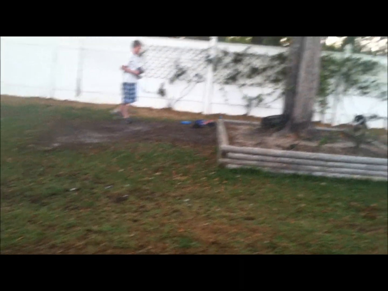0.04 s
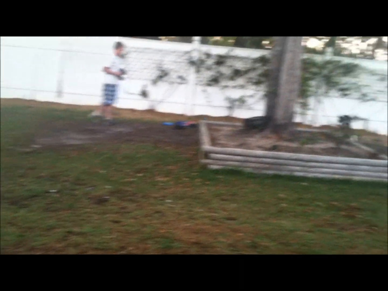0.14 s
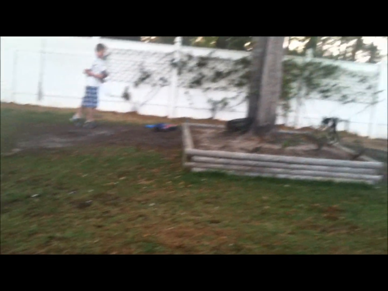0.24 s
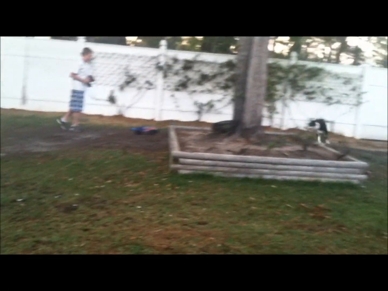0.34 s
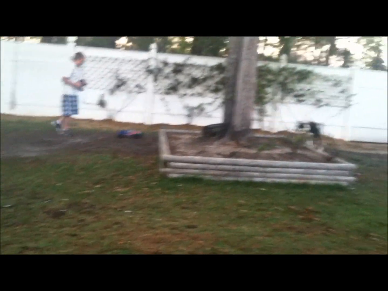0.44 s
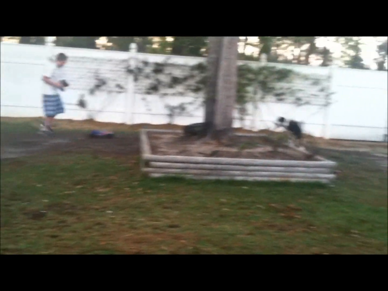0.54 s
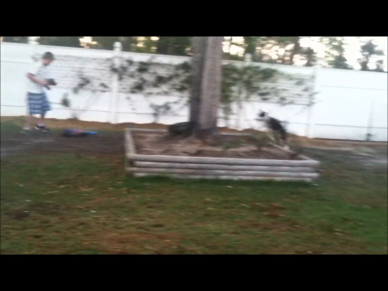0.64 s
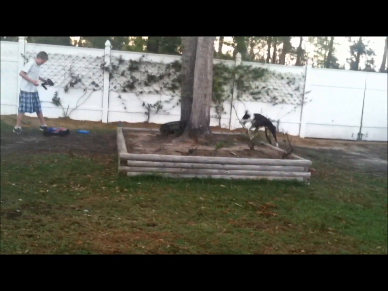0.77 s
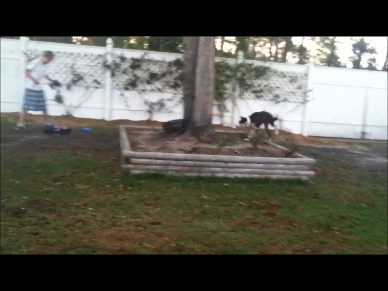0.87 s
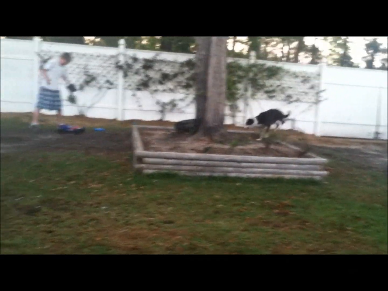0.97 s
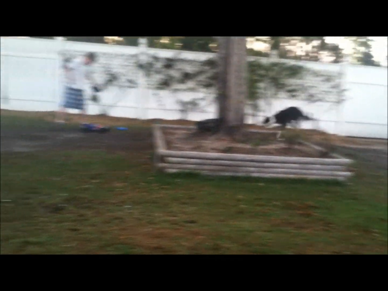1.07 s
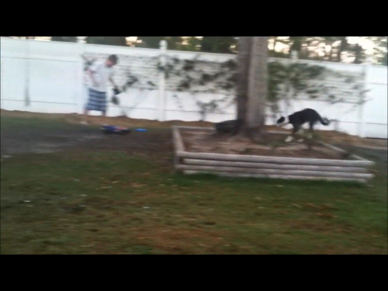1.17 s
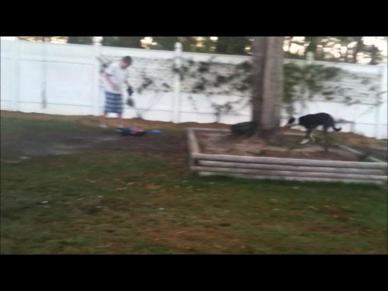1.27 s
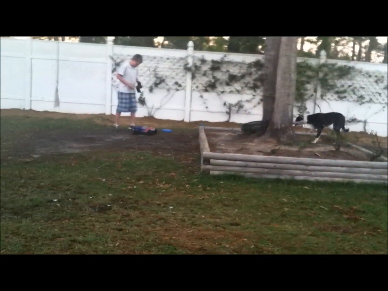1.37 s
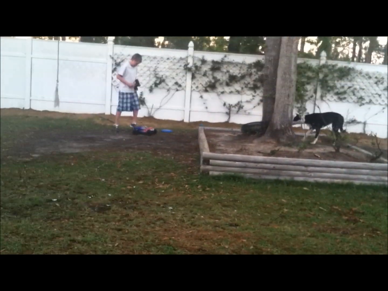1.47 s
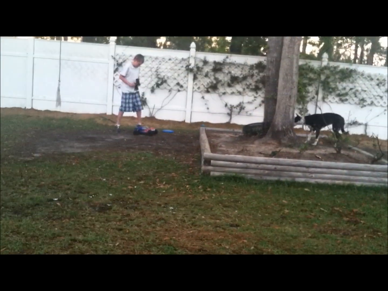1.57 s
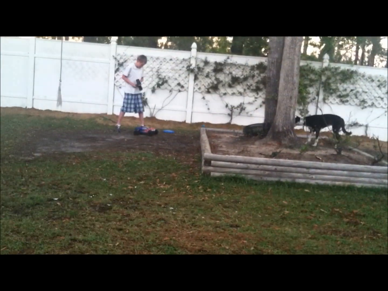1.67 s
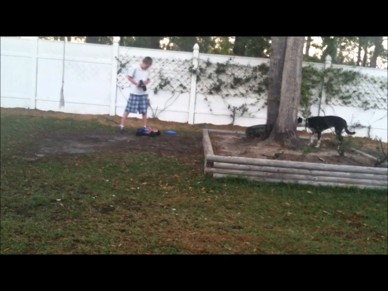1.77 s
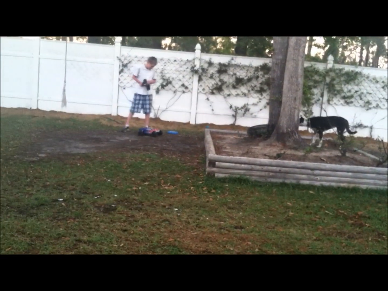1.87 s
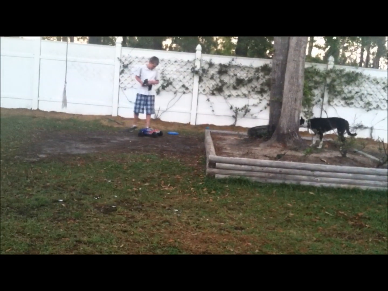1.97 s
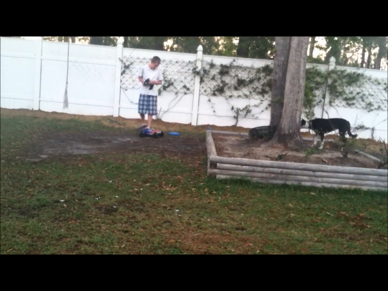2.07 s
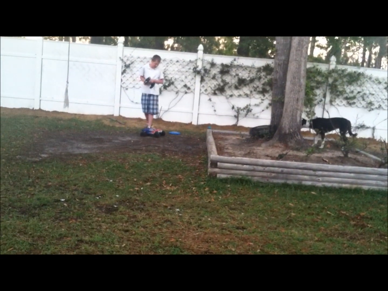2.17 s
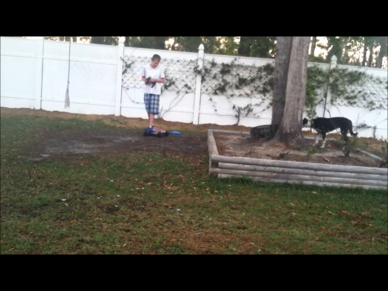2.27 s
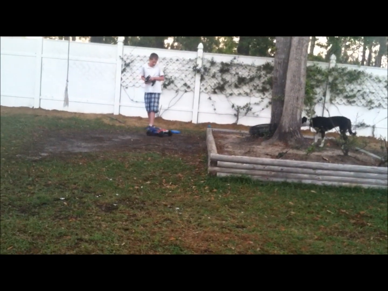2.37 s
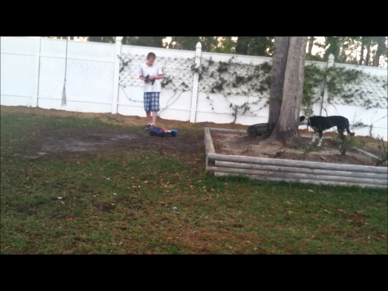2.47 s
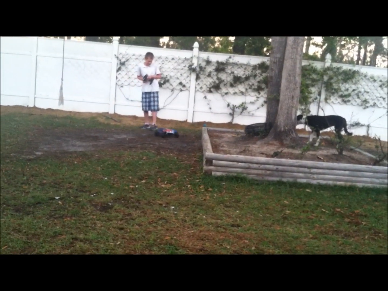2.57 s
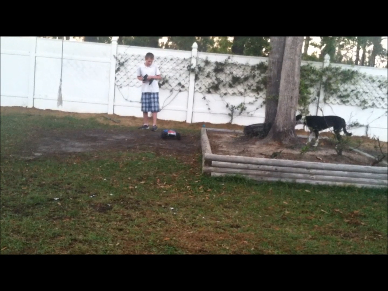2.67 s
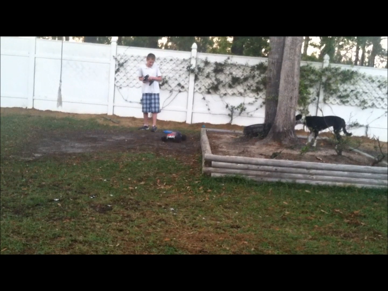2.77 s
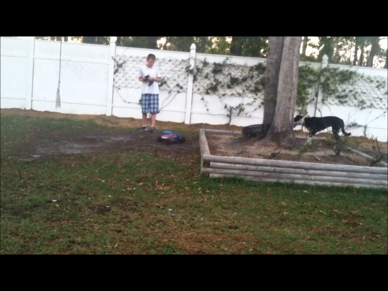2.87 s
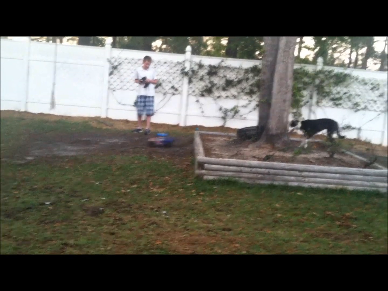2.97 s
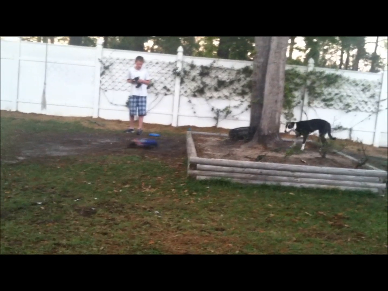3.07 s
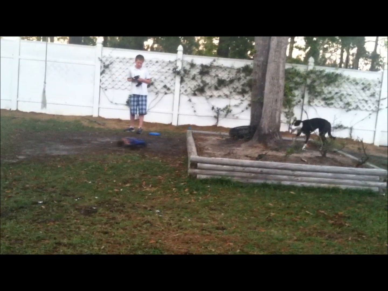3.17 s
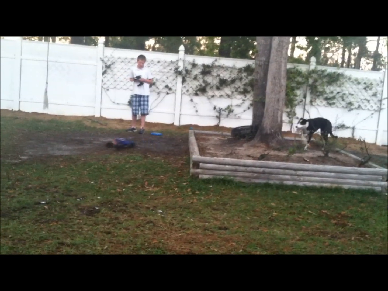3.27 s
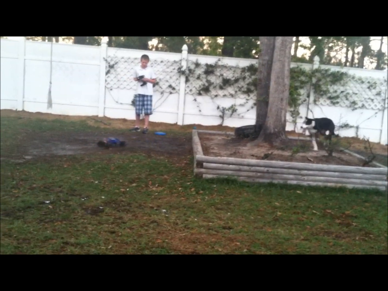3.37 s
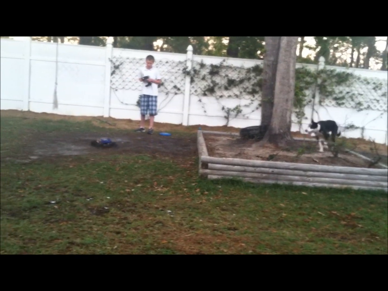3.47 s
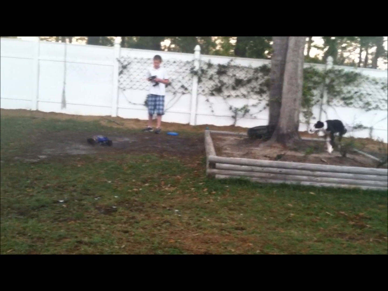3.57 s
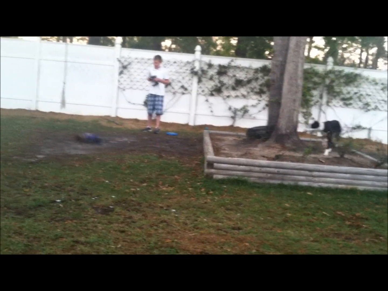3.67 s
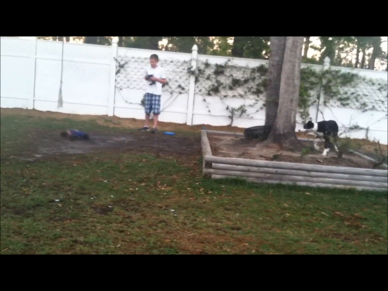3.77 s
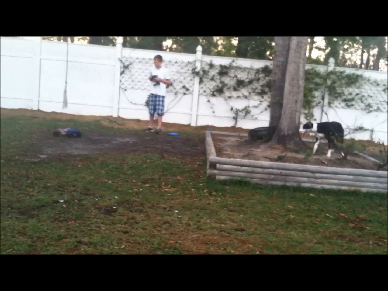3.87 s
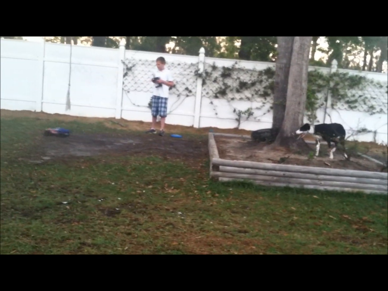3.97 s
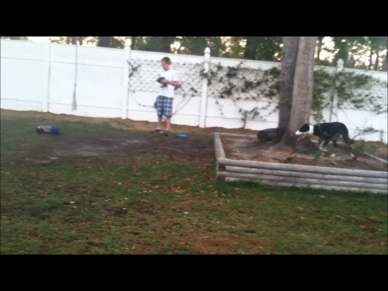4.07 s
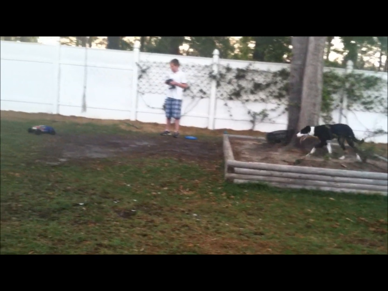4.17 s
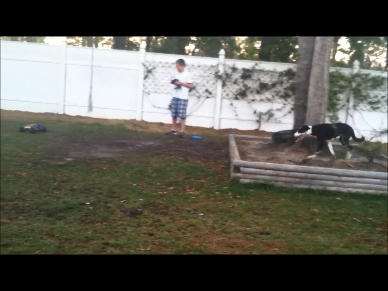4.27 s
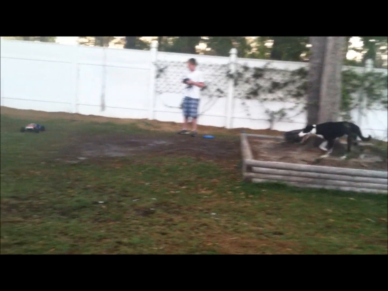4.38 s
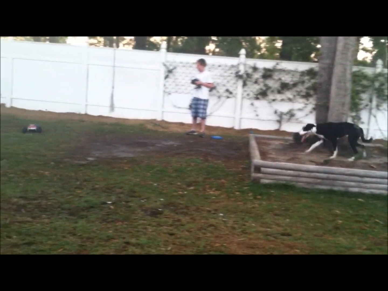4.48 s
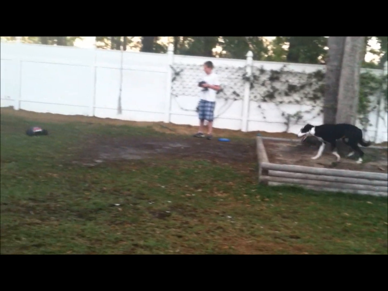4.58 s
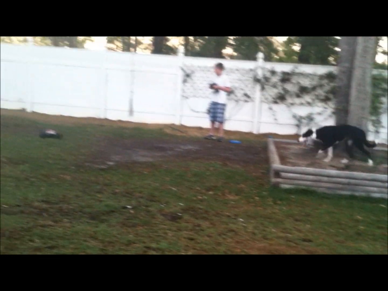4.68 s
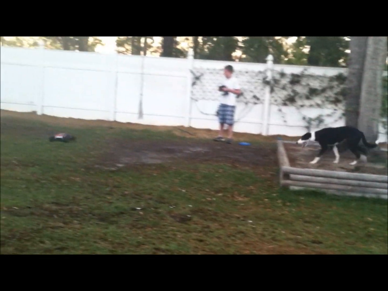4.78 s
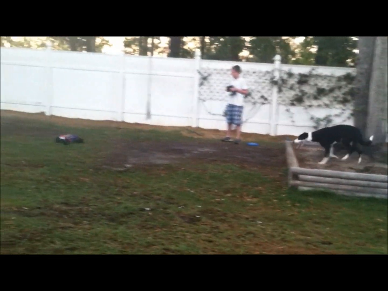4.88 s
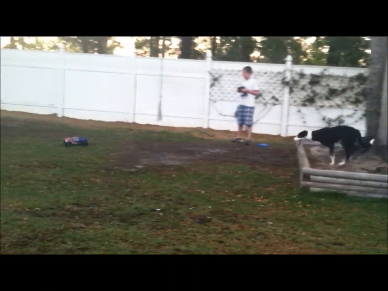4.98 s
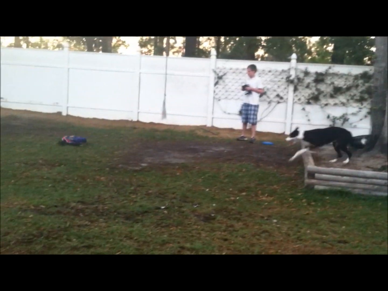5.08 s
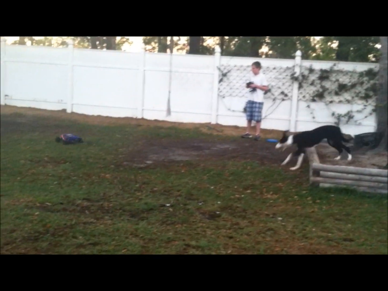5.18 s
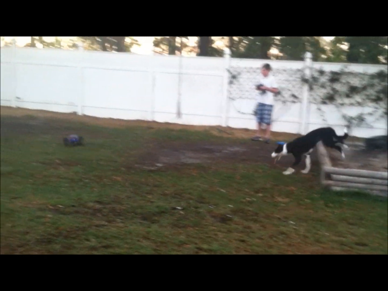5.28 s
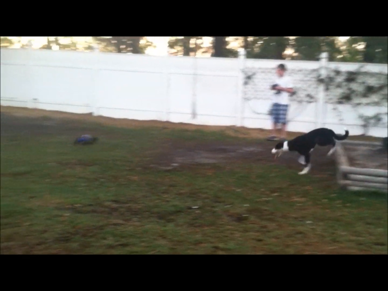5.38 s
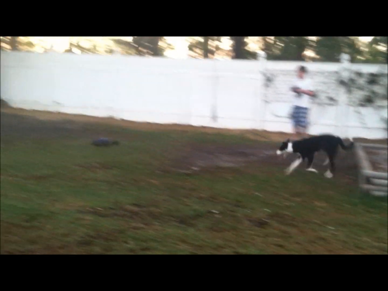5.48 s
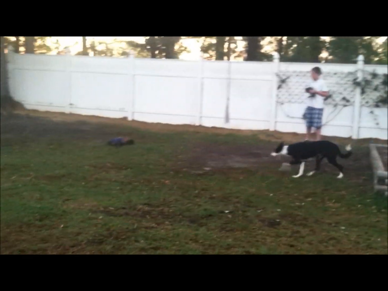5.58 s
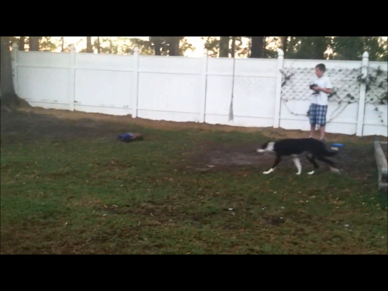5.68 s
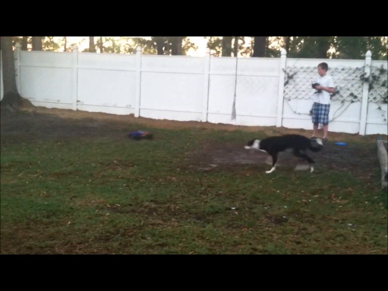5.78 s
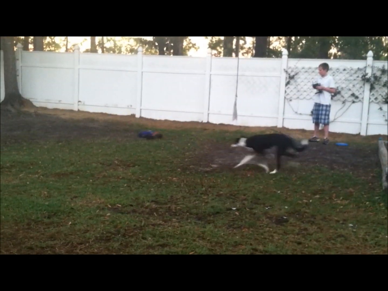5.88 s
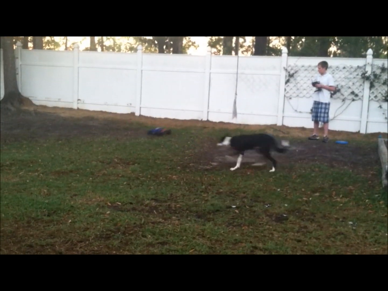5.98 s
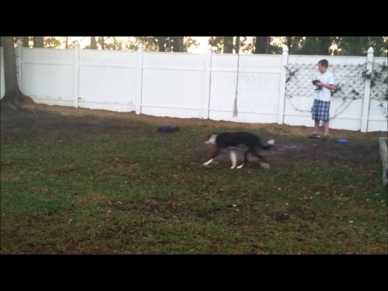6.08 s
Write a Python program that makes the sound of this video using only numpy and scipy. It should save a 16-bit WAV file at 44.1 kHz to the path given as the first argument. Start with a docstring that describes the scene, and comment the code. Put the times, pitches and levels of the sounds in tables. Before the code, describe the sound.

Outdoors in a backyard, smooth faint distant traffic and a few dry ticks nearby. A small electric toy car gives two short rattling buzzes, then goes quiet for about a second. It starts again and keeps running to the end, its plastic gears whining unsteadily, with dense clicks, squeaky tones, wheels drumming on grass and small knocks. One handheld microphone, same sound in both channels.

```python
"""Ticks and rustles sound close by over smooth far traffic, which fades slowly throughout.
A small electric toy car then runs on a lawn: two short bursts, a pause, and a long run to the end.
Its gears make wavering tones and dense clicks that ring in the shell; short rough tones join in.
The wheels drum as lumpy noise on the turf; bumps and snapping gear teeth ring as short dying tones.
Traffic and ticks are shaped noise. One microphone feeds both channels."""
import sys
import numpy as np
from scipy import signal
from scipy.fft import rfft, irfft, next_fast_len
from scipy.io import wavfile

SR = 44100
rng = np.random.default_rng(int(sys.argv[2]) if len(sys.argv) > 2 else 0)


def master_out(mix):
    """Clip the mix to full scale and print it as 16-bit PCM to the path in sys.argv[1]."""
    frames = np.transpose(np.atleast_2d(mix))
    ceiling = np.clip(frames, -1, 1)
    pcm = np.round(ceiling * 32767).astype(np.int16)
    wavfile.write(sys.argv[1], SR, pcm)


N = 270774   # samples

# throttle pulls: on t/s, spin-up time t/s, off t/s
THROTTLE_PULLS = [(0.209, 0.037, 0.62), (0.77, 0.11, 1.07), (2.277, 0.079, 6.3)]
STANDSTILL_DB, COAST_DB_PER_S = -11, 91   # effort at the first turn; its fall after letting go

# gear teeth meeting: t/s, mesh pitch f/Hz, clarity of the whine against the rattle (0-1)
GEAR_MESH = [(0.2, 1016, 0.12), (1.1, 1002, 0.74), (2.36, 705, 0.7), (2.42, 735, 0.86), (2.46, 770, 0.65),
             (2.498, 742, 0.9), (2.54, 796, 0.8), (2.66, 804, 0.5), (2.73, 846, 0.86), (2.768, 780, 0.6),
             (2.815, 844, 0.55), (2.858, 794, 0.8), (2.9, 854, 0.4), (2.96, 846, 0.58), (3.0, 898, .5),
             (3.08, 860, 0.36), (3.18, 876, 0.7), (3.25, 800, 0.5), (3.31, 762, 0.4), (3.35, 806, 0.29),
             (3.4, 865, 0.4), (3.425, 860, 0.1), (3.445, 752, 0.4), (3.54, 745, 0.5), (3.59, 843, 0.3),
             (3.62, 760, .75), (3.68, 757, 0.6), (3.73, 860, 0.7), (3.76, 765, 0.7), (3.88, 860, 0.6),
             (3.93, 767, 0.5), (3.975, 830, .3), (4.0, 981, 0.5), (4.08, 925, 0.4), (4.2, 960, .75),
             (4.3, 974, 0.93), (4.36, 952, 0.72), (4.44, 977, 0.93), (4.52, 930, 0.95), (4.65, 965, 0.7),
             (4.77, 933, .2), (4.81, 864, 0.9), (4.92, 830, 1), (4.99, 879, 0.4), (5.06, 830, 1),
             (5.19, 858, 0.65), (5.26, 845, 0.34), (5.35, 910, 0.5), (5.39, 874, .1), (5.41, 706, 0.8),
             (5.51, 716, 0.9), (5.62, 845, 0.41), (5.7, 819, 0.28), (5.95, 860, 0.35), (6.14, 876, 0.43)]
# upper tones of the whine: multiple of the mesh pitch, level/dB against each other
WHINE_PARTIALS = [(3, -15), (4, -8), (5, -3), (6, -5), (7, -7), (8, -5), (9, -4), (10, 0), (11, -6),
                  (12, -12)]
# main whine, at twice the mesh pitch, before the throb: t/s, level/dB
MAIN_WHINE = [(2.38, -84), (2.42, -45), (2.45, -41), (2.51, -43), (2.56, -47.5), (2.63, -51), (2.66, -50),
              (2.69, -45), (2.72, -48.5), (2.78, -45.5), (2.85, -41.5), (2.93, -53), (2.96, -45),
              (3.02, -53), (3.11, -52), (3.17, -48), (3.23, -45), (3.26, -54), (3.29, -47), (3.33, -54),
              (3.4, -48), (3.47, -48), (3.53, -50), (3.575, -57), (3.61, -43), (3.66, -53), (3.71, -58),
              (3.74, -48), (3.86, -52), (3.9, -48.5), (3.98, -53), (4.01, -47.5), (4.08, -53), (4.17, -48),
              (4.235, -59), (4.285, -49), (4.36, -55), (4.43, -48.5), (4.52, -47.5), (4.56, -56),
              (4.65, -53), (4.7, -61), (4.79, -64), (4.81, -49), (4.86, -50), (4.91, -49.5), (4.99, -55),
              (5.06, -48), (5.1, -61), (5.15, -55), (5.24, -62), (5.4, -64), (5.47, -55), (5.53, -60),
              (5.62, -52.5), (5.7, -64)]
MAIN_THROB = 0.8   # factor on the throb dB
# an uneven gear bites once a turn: t/s, turns per s, strength of the bite/dB before each sound's own factor
UNEVEN_GEAR = [(0.27, 27.5, 8), (0.34, 29.5, 10), (0.39, 35, 10), (0.6, 35.5, 10), (0.66, 30, 9),
               (0.72, 30, 1.5), (2.3, 35, 3), (2.6, 45, 3.5), (4.0, 40, 2.5), (6.1, 42, 2.5)]
# the hollow shell hums roughly at one pitch: t/s, level/dB at full throttle
SHELL_HUM = [(2.3, -60), (3.2, -61), (3.9, -57.5), (4.15, -46.5), (4.6, -64), (4.9, -65), (5.15, -49.5),
             (5.32, -49.5), (5.5, -78), (5.85, -65), (6.0, -49), (6.14, -55)]
HUM_HZ = 860
# resonances of the plastic shell: f/Hz, width f/Hz, level/dB against each other
SHELL_RESONANCES = [(1480, 220, 2.5), (2050, 10.6, 11.5), (3030, 1300, 1), (3660, 430, 15),
                    (4530, 580, 11.5), (5410, 320, 15), (6550, 1010, 15), (7700, 1010, 18.5),
                    (9370, 950, 14.5)]
# four parts of the drive: low edge f/Hz, high edge f/Hz, whine share at full clarity (0-1),
# factor on the throb dB, factor on the effort dB
DRIVE_PARTS = [(1196, 2556, 0.05, 0.071, 1.3), (2430, 6200, 0.31, 0.1, 1.8), (6620, 8090, 0.63, 0.34, 1.5),
               (7830, 12200, 0.12, 0.26, 2)]
# levels of those parts at full throttle, shifting as the car turns:
# t/s, low rattle level/dB, gearbox level/dB, motor can level/dB, top fizz level/dB
PART_LEVELS = [(0.3, -47, -47.5, -55, -52.5), (0.61, -48.5, -47, -49, -51.5),
               (0.72, -39.5, -49, -44.5, -46), (0.79, -45, -49, -51, -44), (0.85, -43.5, -48.5, -51, -53.5),
               (1.05, -47.5, -52, -49, -54.5), (1.13, -50.5, -51.5, -53, -59), (1.25, -51, -43, -54, -54),
               (2.3, -41.5, -50, -50.5, -58), (2.44, -44.5, -49, -47.5, -58), (2.6, -46, -49, -45.5, -56.5),
               (2.86, -45.5, -48.5, -51, -54), (3.05, -49.5, -44, -51.5, -50.5),
               (3.29, -44.5, -45, -43, -54.5), (3.6, -45.5, -45, -47, -51),
               (3.92, -46, -46.5, -47.5, -52.5), (4.15, -46.5, -50.5, -50.5, -52),
               (4.45, -52.5, -49.5, -55, -49.5), (4.75, -48.5, -45, -58, -51.5),
               (4.98, -55, -48.5, -53.5, -53), (5.25, -50, -47, -48, -50), (5.62, -51.5, -45.5, -49, -52),
               (5.82, -53.5, -48, -49, -55), (6.14, -52, -49, -45, -53)]

# short rough tones of gears and shell, gliding or nearly steady:
# start t/s, length t/s, first f/Hz, last f/Hz, level/dB before the throb
SHORT_TONES = [(0.257, 0.12, 2050, 2157, -58), (0.312, .03, 2000, 2030, -48), (.4, 0.037, 2050, 1950, -52),
               (0.47, 0.042, 2030, 2050, -57), (0.562, 0.051, 2000, 2014, -50.5),
               (0.633, 0.033, 2120, 2100, -54), (0.36, 0.04, 2900, 2920, -56),
               (.395, 0.066, 3130, 3000, -55), (0.447, 0.069, 3150, 3310, -54),
               (0.492, 0.049, 3080, 2950, -52), (0.544, .035, 3000, 3030, -54),
               (.565, .05, 3250, 3100, -50.5), (0.208, 0.021, 1420, 1480, -50.5),
               (0.458, 0.097, 1300, 1270, -58), (.49, 0.18, 1530, 1550, -64),
               (0.813, 0.064, 1600, 1645, -51.5), (0.824, 0.077, 1440, 1480, -55),
               (0.896, 0.067, 1640, 1585, -53.5), (1.047, 0.046, 1620, 1590, -52.5),
               (0.853, 0.07, 2370, 2310, -57.5), (0.898, 0.065, 2080, 2050, -52.5),
               (.96, 0.055, 1860, 1860, -55), (1.027, 0.043, 2030, 2050, -48),
               (2.342, 0.092, 1500, 2220, -51.5), (2.289, 0.057, 1330, 1600, -50.5),
               (2.3, 0.065, 1950, 2130, -53), (2.38, 0.073, 3000, 3580, -56),
               (2.446, 0.067, 3750, 3820, -53), (2.45, 0.13, 2200, 2110, -54.5),
               (2.563, 0.32, 2400, 2570, -59), (2.675, .03, 4050, 3900, -54),
               (2.71, 0.086, 4200, 4140, -51), (2.808, 0.044, 3600, 3270, -45.5),
               (2.82, .03, 4100, 4060, -50), (2.922, .1, 3750, 3650, -58), (3.145, .07, 4200, 4230, -56),
               (3.266, .03, 4250, 4250, -53), (2.903, 0.074, 1990, 2033, -45),
               (3.2, 0.079, 2080, 2150, -63), (3.226, 0.045, 1500, 1490, -49),
               (3.432, .05, 2150, 2330, -53), (3.428, 0.037, 3800, 3820, -48),
               (3.401, .42, 5210, 5280, -55.5), (3.501, 0.62, 4520, 4580, -64),
               (3.548, 0.098, 5300, 5200, -51), (3.699, .08, 4550, 4570, -52),
               (3.798, .05, 4150, 4100, -54), (3.568, 0.052, 1980, 2030, -47),
               (3.622, 0.059, 2170, 2260, -48.5), (3.68, 0.034, 2280, 2280, -56),
               (3.738, .03, 2280, 2340, -47), (3.77, 0.035, 2210, 2290, -43.5),
               (3.823, 0.03, 2350, 2420, -49), (3.905, .035, 2280, 2250, -45.5),
               (3.939, .03, 2400, 2420, -52), (4.078, 0.09, 1480, 1480, -65),
               (4.03, 0.11, 2850, 2800, -49.5), (3.999, 0.67, 4720, 4625, -59),
               (4.6, 0.077, 3720, 3760, -58), (3.981, .72, 9430, 9330, -56),
               (5.395, 0.097, 6920, 7050, -53), (4.739, 0.13, 4140, 4250, -54),
               (4.959, 0.061, 4550, 4500, -53), (5.081, 0.18, 4300, 4270, -52.5),
               (5.252, 0.096, 4280, 4450, -51.5), (5.182, 0.11, 7800, 7700, -51),
               (5.4, .11, 2060, 2140, -60), (5.408, 0.15, 3550, 3600, -61), (5.522, 0.076, 7400, 7700, -50),
               (5.55, 0.096, 3900, 4400, -51.5), (5.42, 0.13, 4300, 4360, -56),
               (5.634, 0.064, 3650, 3780, -49), (5.684, 0.068, 4130, 4200, -50.5),
               (5.944, 0.092, 4320, 4350, -51.5), (5.98, .05, 3900, 3900, -55),
               (6.068, 0.044, 4100, 3910, -51)]
TONE_WOBBLE, TONE_THROB = 0.009, 0.4   # share of the pitch; factor on the throb dB
TONE_EDGE = 0.2   # share of a tone's length spent swelling, and again dying
# two dark gaps in the drive's sound wander as the car turns:
# t/s, lower centre f/Hz, its depth (0-1), upper centre f/Hz, its depth (0-1)
DARK_GAPS = [(0.2, 2740, 0.4, 6200, 0.2), (2.4, 2690, 0.87, 5700, 0.13), (3.1, 2780, 0.14, 5300, 0.55),
             (3.5, 2700, 0.66, 5700, 0.45), (3.9, 2735, 0.43, 5930, 0.83), (4.2, 2590, 0.45, 6100, 0),
             (4.68, 2550, 0.66, 6200, 0.24), (4.8, 2950, 0.67, 6125, 0.15), (5.3, 3052, 0.54, 6100, 0.3),
             (5.42, 2610, .6, 5900, 0.54), (5.75, 2655, 0.16, 5800, 0.3), (6.14, 2506, 0.26, 5840, 0.21)]
LOWER_GAP_WIDTH_HZ, UPPER_GAP_WIDTH_HZ = 450, 1100

# wheels on turf at full throttle: t/s, drumming level/dB, shell boom level/dB, deep rumble level/dB
TURF_LEVELS = [(0.28, -56.5, -59, -79), (0.4, -50, -51.5, -83), (0.62, -51, -54.5, -75),
               (.85, -48.5, -46, -67), (1.0, -49.5, -51.5, -75), (1.08, -50, -71, -77),
               (1.17, -58, -54, -60), (2.45, -49, -46.5, -68), (2.62, -51, -49.5, -66),
               (3.05, -48, -49.5, -66), (3.25, -45.5, -45, -57), (3.5, -47, -47.5, -66),
               (3.8, -52, -52.5, -66), (4.28, -51.5, -50.5, -54.5), (4.5, -52.5, -52.5, -57),
               (4.75, -49.5, -47.5, -59), (4.95, -54, -54, -63.5), (5.25, -52, -51, -62.5),
               (5.55, -54.5, -54, -64.5), (5.75, -50, -49.5, -58), (5.9, -52.5, -53, -61),
               (6.14, -48, -54, -65)]
TURF_FOLLOWS = 0.89   # factor on the effort dB
# chassis on bumps, low thuds and hollower knocks: t/s, peak level/dB, f/Hz
CHASSIS_BUMPS = [(0.955, -42, 251), (2.837, -34.5, 664), (3.127, -34, 710), (3.221, -38, 250),
                 (3.316, -41, 735), (3.38, -34, 768), (3.381, -42.5, 286), (3.47, -34.5, 574),
                 (3.589, -33, 650.7), (4.16, -40, 226), (4.272, -39, 239), (4.38, -38, 241),
                 (4.795, -35.5, 689.4), (5.739, -42, 227), (5.991, -37.5, 290.3)]
# gear teeth snapping under a jolt: t/s, peak level/dB, f/Hz
TOOTH_SNAPS = [(0.308, -43, 4960), (0.4015, -42, 7750), (0.997, -42, 7200), (2.4326, -31.5, 7100),
               (2.481, -36, 7370), (2.7648, -37.5, 3730), (2.8524, -36.5, 3850), (3.2386, -37.5, 3720),
               (3.464, -38, 7700), (3.5904, -36, 6900), (3.9227, -37, 7640), (5.6521, -36.5, 7300),
               (5.915, -37, 7500), (5.9412, -39, 6800), (6.0918, -36.5, 6600)]

# faint dry ticks and rustles nearby: t/s, level/dB (5 dB above the starting rms), decay time t/ms
NEARBY_TICKS = [(0.006, -54, 1.1), (0.023, -47, 1.3), (0.035, -60, 1.5), (0.13, -59.5, 37),
                (0.212, -48, 5.4), (0.2267, -39, .7), (0.2327, -39, .7), (0.783, -44, 2.3),
                (0.795, -43, 2.3), (1.392, -46.5, 2), (1.45, -49.5, 2.3), (1.9294, -55, 2.3),
                (2.1494, -54, 2.3), (2.282, -49, 2.3), (4.5387, -49, 2.3)]
# tone colour of the ticks: f/Hz, level/dB in each Hz, against each other
TICK_SPECTRUM = [(1470, -44), (2500, -26), (2710, -52), (3270, 1), (5830, -3), (7640, 5), (15000, -21)]
# tone colour of far traffic: f/Hz, level/dB in each Hz, against each other
TRAFFIC_SPECTRUM = [(15, -69), (25, -20), (37, -45), (64, -21.5), (125, -9), (198, -4.5), (245, -5.5),
                    (377, -11.5), (409, -15.5), (443, -11), (550, -5.5), (967, -2), (1940, -13),
                    (2410, -26), (15400, -41.5)]
TRAFFIC_DB, TRAFFIC_FADE_DB_PER_S = -49.5, 0.22   # level at the start; its steady fall

MIC_ROLLOFF_HZ, CUTOFF_HZ = 10500, 15750


def drive():
    """Upper whine and rattle leave through four pulsing parts; main whine and hum are added directly."""
    upper_tones, main_and_hum = whine(wobble=0.006, flicker_db=0.8)
    # two separate rattles, so that neighbouring parts rattle apart
    rattles = [rattle(per_s=7000, spread_db=2.0, shell_db=0.5, chink_db=-7) for _ in range(2)]
    clarity = in_time(GEAR_MESH)[1]
    effort_db, throb_db = effort(), throb()
    out = main_and_hum
    for k, (part, level_db) in enumerate(zip(DRIVE_PARTS, in_time(PART_LEVELS))):
        low_hz, high_hz, full_share, throb_factor, effort_factor = part
        share = np.clip(full_share * clarity, 0, 0.95)
        tones = rms_one(band(upper_tones, low_hz, high_hz))
        noise = rms_one(band(rattles[k % 2], low_hz, high_hz))
        mix = np.sqrt(share) * tones + np.sqrt(1 - share) * noise
        pulse = from_db(throb_factor * throb_db + 1.34 * drift(7.2))
        out = out + from_db(level_db + effort_factor * effort_db) * rms_one(mix * pulse)
    return out


def whine(wobble, flicker_db):
    """Load on the grass shakes the gear speed; worn teeth blur each tone and break it into squeaks."""
    mesh_hz = in_time(GEAR_MESH)[0]
    shaken_hz = mesh_hz * (1 + wobble * (drift(13) + drift(39.5)))
    phase = 2 * np.pi * np.cumsum(shaken_hz) / SR
    blur_hz, squeak_db = 14, 0.7   # basic blur rate; squeak swing per octave above the mesh pitch
    upper_tones = np.zeros(N)
    for k, db in WHINE_PARTIALS:
        swing_db = flicker_db * drift(3.7) + squeak_db * np.log2(k) * drift(25)
        tone = rough_tone(k * phase, blur_hz * (1.03 * k + 2.4), halo=0.89)
        upper_tones += from_db(db + swing_db) * tone
    main = from_db(in_time(MAIN_WHINE)[0]) * rough_tone(2 * phase, 7 * blur_hz, halo=0.58)
    main = main * from_db(MAIN_THROB * throb())
    hum_phase = 2 * np.pi * HUM_HZ * np.cumsum(1 + 2 * wobble * drift(19.56)) / SR
    hum = from_db(in_time(SHELL_HUM)[0] + effort()) * rough_tone(hum_phase, 3 * blur_hz)
    return upper_tones, main + hum


def rattle(per_s, spread_db, shell_db, chink_db):
    """Dense uneven tooth clicks make small loose parts chink by fits and the shell resonate."""
    sizes = from_db(spread_db * np.minimum(rng.exponential(1, N), 5)) * rng.choice([-1, 1], N)
    clicks = sizes * (rng.random(N) < per_s / SR)
    pitches_hz = np.geomspace(1300, 10500, 28) * rng.uniform(0.97, 1.03, 28)
    dealt = rng.integers(0, 150, N)   # only clicks dealt 0-27 strike a loose part
    chinks = np.zeros(N)
    for k, hz in enumerate(pitches_hz):
        struck = clicks * (dealt == k) + 1e-18   # tiny offset avoids exact silence
        chinks += resonance(struck, hz, hz / 70) * from_db(3.5 * drift(6))
    clicks = rms_one(clicks) + from_db(chink_db) * rms_one(chinks)
    rings = np.zeros(N)
    for k, (hz, width_hz, db) in enumerate(SHELL_RESONANCES):
        rings += from_db(db) * resonance(clicks, hz, width_hz) * (-1) ** k   # neighbours in opposite sign
    return clicks + from_db(shell_db) * rings


def short_tones():
    """Short rough tones of gears and shell, gliding or nearly steady, blurrier when higher."""
    t, out = np.arange(N) / SR, np.zeros(N)
    shake = 1 + TONE_WOBBLE * drift(20)
    for start, length, first_hz, last_hz, db in SHORT_TONES:
        along = np.clip((t - start) / length, -0.1, 1.1)   # the edges reach a little outside the tone
        swell = np.clip((np.minimum(along, 1 - along) + 0.1) / TONE_EDGE, 0, 1)
        pitch_hz = (first_hz + (last_hz - first_hz) * along) * shake
        phase = 2 * np.pi * np.cumsum(pitch_hz) / SR
        halo = np.clip(np.sqrt(first_hz / 9500), 0.62, 0.97)
        out += swell * from_db(db) * rough_tone(phase, first_hz / 35, halo=halo)
    return out * from_db(TONE_THROB * throb())


def throb():
    """The uneven gear's bite in dB, once a turn, with a sharper peak than a sine."""
    turns_per_s, strength_db = in_time(UNEVEN_GEAR)
    bite = np.cos(2 * np.pi * np.cumsum(turns_per_s) / SR + 2.92)
    return strength_db * (bite + 0.45 * (2 * bite ** 2 - 1))   # the inner bracket is the second harmonic


def effort():
    """How hard the car works, dB under full throttle: a quick spin-up, a hold, a coast to rest."""
    t, pulls = np.arange(N) / SR, []
    for on, spin_up, off in THROTTLE_PULLS:
        rise_db = STANDSTILL_DB * np.exp(-np.clip(t - on, -0.2, 9) / spin_up)
        coast_db = COAST_DB_PER_S * np.clip(t - off, 0, 9)
        pulls.append(rise_db - coast_db - 200 * (t < on))   # silent before the pull
    return np.max(pulls, axis=0)


def gap(x, centre_hz, width_hz, depth):
    """Takes part of a moving band away: shift it to zero pitch, smooth, shift back, subtract."""
    turn = np.exp(2j * np.pi * np.cumsum(centre_hz) / SR)
    inside = signal.filtfilt(*signal.butter(1, width_hz / 2, fs=SR), x / turn) * turn
    return x - 2 * np.clip(depth, 0, 1) * inside.real


def rolling():
    """Tyres on tufts: lumpy noise in a low chassis mode, in the hollow shell and in a deep band."""
    drum, boom, deep = from_db(np.array(in_time(TURF_LEVELS)) + TURF_FOLLOWS * effort())
    noise = rng.standard_normal((3, N))
    low = resonance(band(noise[0], 182, 407), 264.6, 91) * from_db(1.35 * drift(9.4))
    hollow = resonance(noise[1], 628, 97) + from_db(-2.0) * resonance(noise[1], 732, 62)
    hollow = band(hollow, 540, 2450) * from_db(1.04 * drift(22.0))
    rumble = band(noise[2], 148, 194)
    return drum * rms_one(low) + boom * rms_one(hollow) + deep * rms_one(rumble)


def bumps():
    """The chassis knocks on bumps and rings for a few cycles."""
    return blows(CHASSIS_BUMPS, cycles=18.3)


def snaps():
    """Gear teeth snap under a jolt and ring for many cycles at a high pitch."""
    return blows(TOOTH_SNAPS, cycles=180.0)


def ticks():
    """Short puffs of bright noise, each starting at once and dying away."""
    envelope, t = np.zeros(N), np.arange(N) / SR
    for start, db, decay_ms in NEARBY_TICKS:
        decay = np.exp(-np.clip(t - start, 0, 1) * 1000 / decay_ms)
        envelope += from_db(db - 5) * (t > start) * decay
    return envelope * coloured(rng.standard_normal(N), TICK_SPECTRUM)


def traffic():
    """A far, smooth roar: shaped noise, slowly fading."""
    level_db = TRAFFIC_DB - TRAFFIC_FADE_DB_PER_S * np.arange(N) / SR
    return from_db(level_db + 0.25 * drift(5.5)) * coloured(rng.standard_normal(N), TRAFFIC_SPECTRUM)


def rough_tone(phase, blur_hz, halo=0.84):
    """A steady line inside a halo whose height and phase wander at random; rms about 1."""
    steady = np.sqrt(2 - 2 * halo ** 2)
    return np.sin(phase) * (steady + halo * drift(blur_hz)) + np.cos(phase) * halo * drift(blur_hz)


def blows(table, cycles):
    """Each row rings at its pitch with a soft start and falls 40 dB within the given cycles."""
    out = np.zeros(N + SR)
    for start, db, hz in table:
        t = np.arange(int(cycles / hz * SR)) / SR
        shape = (1 - np.exp(-t * hz * 2.0)) * from_db(-40 * t * hz / cycles)
        at = round(start * SR)
        out[at:at + len(t)] += from_db(db) * shape / shape.max() * np.sin(2 * np.pi * hz * t)
    return out[:N]


def drift(rate_hz):
    """Slow random wandering with spread 1, made at a fortieth of the sample rate."""
    r = np.exp(-80 * np.pi * rate_hz / SR)
    noise = rng.standard_normal(N // 40 + 2002)
    slow = signal.lfilter([1], [1, -2 * r, r * r], noise)[2000:]   # drop the filter's start
    return np.interp(np.arange(N) / 40, np.arange(len(slow)), rms_one(slow))


def band(x, low_hz, high_hz, order=2):
    """Keeps the sound between two pitches."""
    edges_hz = [low_hz, min(high_hz, 0.45 * SR)]
    return signal.sosfilt(signal.butter(order, edges_hz, "band", fs=SR, output="sos"), x)


def resonance(x, hz, width_hz):
    """A body that rings at one pitch; a narrower width rings longer."""
    r = np.exp(-np.pi * width_hz / SR)
    feed = np.array([1, 0, -1]) * (1 - r * r) / 2
    return signal.lfilter(feed, [1, -2 * r * np.cos(2 * np.pi * hz / SR), r * r], x)


def coloured(x, spectrum):
    """Shapes a noise by a dB-per-Hz outline; rms 1."""
    hz, db = np.transpose(spectrum)
    size = next_fast_len(N)
    grid_hz = np.maximum(np.arange(size // 2 + 1) * SR / size, 1)
    gain = from_db(np.interp(np.log(grid_hz), np.log(hz), db))
    return rms_one(irfft(rfft(x, size) * gain, size)[:N])


def in_time(rows):
    """Table columns joined by straight lines over time."""
    t, *columns = np.transpose(rows)
    return [np.interp(np.arange(N) / SR, t, column) for column in columns]


def from_db(db):
    """Decibels to an amplitude factor."""
    return 10 ** (np.asarray(db) / 20)


def rms_one(x):
    """Scales a sound to rms 1."""
    return x / np.sqrt(np.mean(x ** 2) + 1e-20)


def scene():
    """Car, ticks and traffic, the same in both channels."""
    lower_hz, lower_depth, upper_hz, upper_depth = in_time(DARK_GAPS)
    gears = drive() + short_tones()
    gears = gap(gears, lower_hz, LOWER_GAP_WIDTH_HZ, lower_depth)
    gears = gap(gears, upper_hz, UPPER_GAP_WIDTH_HZ, upper_depth)
    mono = gears + rolling() + bumps() + snaps() + ticks() + traffic()
    return np.array([mono, mono])


def record(dry):
    """The microphone dulls the highest treble; the top is cut."""
    dull = signal.sosfilt(signal.butter(2, MIC_ROLLOFF_HZ, fs=SR, output="sos"), dry)
    return signal.sosfilt(signal.cheby2(20, 60, CUTOFF_HZ, fs=SR, output="sos"), dull)


dry = scene()
out = record(dry)
master_out(out)
```